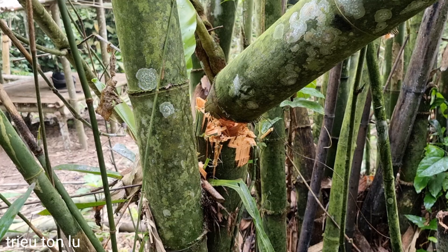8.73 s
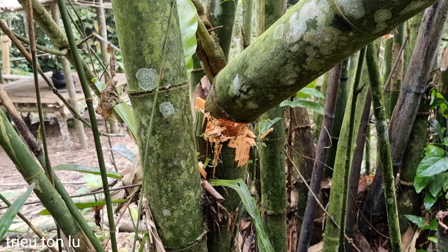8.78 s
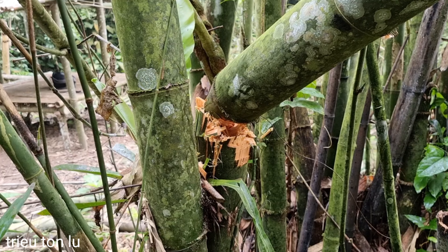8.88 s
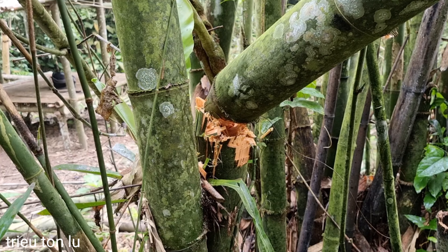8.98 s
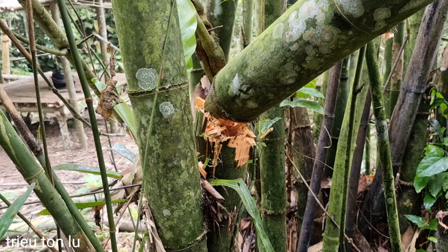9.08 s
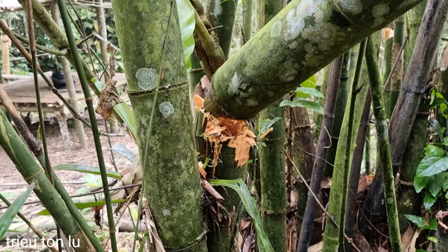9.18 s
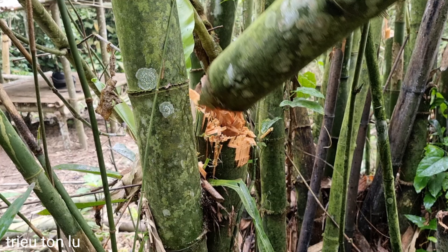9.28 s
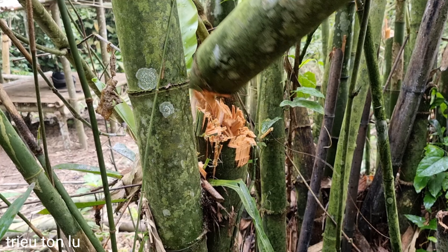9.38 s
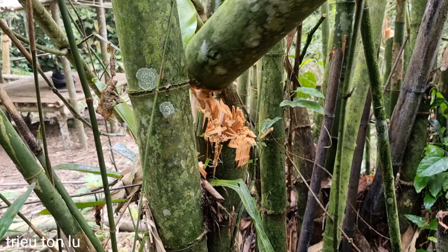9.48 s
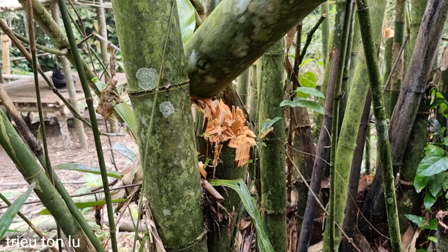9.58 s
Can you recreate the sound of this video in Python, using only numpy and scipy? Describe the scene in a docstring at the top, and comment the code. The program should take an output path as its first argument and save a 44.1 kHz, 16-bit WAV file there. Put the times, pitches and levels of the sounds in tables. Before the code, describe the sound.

A blade chops a thick hollow bamboo stem in sharp ringing cracks, then the cut stem is dragged with leafy scrapes and knocks in a grove.

```python
"""A grove hushes under far gliding whistles; a blade then chops a hollow green stem in noise bursts through
ringing modes, and the canes, trunks and a far slope answer with decaying noise tails. Splinters tick in between.
A near bird, left of centre, sings sliding sines and then an upward trill. Later the cut stem is dragged a little
right of centre: filtered leaf grains and rumble swell in slips, with low thumps and knocks on standing canes."""
import sys
import numpy as np
from scipy import signal
from scipy.fft import rfft, irfft, next_fast_len
from scipy.io import wavfile
from scipy.ndimage import uniform_filter1d, map_coordinates

SR = 44100
rng = np.random.default_rng(int(sys.argv[2]) if len(sys.argv) > 2 else 0)


def master_out(mix):
    """Clip the mix to full scale and print it as 16-bit PCM to the path in sys.argv[1]."""
    frames = np.transpose(np.atleast_2d(mix))
    ceiling = np.clip(frames, -1, 1)
    pcm = np.round(ceiling * 32767).astype(np.int16)
    wavfile.write(sys.argv[1], SR, pcm)


N = 424683

# Table levels are relative: each layer's mix gain sets its final loudness. Positive left-right dB leans left.

# Distant leaf hush over time: (time [s], level [dB])
HUSH_LEVEL = [(0, -68.5), (1.9, -67.5), (3, -67), (3.8, -67.5), (5.6, -68.5), (6.3, -70.5), (7, -65.5),
              (8.5, -63.5), (9.1, -69.5), (9.63, -64.5)]
# Colour of the hush: (frequency [Hz], density per hertz [dB])
HUSH_COLOUR = [(26, -41.5), (45, -10.5), (178, -12), (245, -3), (996, 1.5), (1270, 3), (1630, -6.5),
               (2030, -4), (3660, -7), (7850, -14), (10000, -22), (14500, -16), (16000, -35)]
# Stereo width of the hush: (frequency [Hz], left-right likeness [-1 to 1])
HUSH_LIKENESS = [(60, 0.41), (240, 0.1), (950, -0.83), (3770, 0.93), (15000, -0.16)]

# Near bird's opening notes: (time [s], start [Hz], end [Hz], glide [s], length [s], level [dB])
OPENING = [(1.903, 7530, 6220, 0.018, 0.043, -56), (2.109, 7140, 7890, 0.0039, 0.056, -54.5),
           (2.347, 8500, 8340, 0.011, 0.034, -53)]
# Its trill, one upward flick repeated: (time [s], level [dB])
TRILL = [(2.483, -49), (2.61, -47), (2.74, -46.5), (2.872, -47), (3.009, -47.5), (3.139, -50), (3.279, -51)]
FLICK_FROM_HZ, FLICK_TO_HZ, FLICK_GLIDE_S, FLICK_S = 5920, 8310, 0.0072, 0.023
SONG_ECHO_DB, SONG_PAN_DB = 2.5, 8
# Far whistles: (time [s], start [Hz], end [Hz], length [s], level [dB])
WHISTLES = [(0.049, 6090, 6150, .09, -80), (0.167, 6100, 6200, .05, -83), (0.888, 6110, 6200, .07, -80),
            (0.88, 3260, 3350, .1, -76), (1.302, 2755, 2900, .12, -84), (1.37, 6390, 6400, .09, -85),
            (3.4, 4150, 4150, .25, -86), (3.718, 6250, 6400, .12, -80), (4.651, 6780, 6700, .18, -84),
            (5.496, 2930, 3300, .06, -76), (5.555, 3300, 3050, .03, -78), (5.711, 6270, 6370, .24, -78),
            (5.749, 3160, 3350, .085, -81), (5.938, 6600, 6680, .17, -82), (6.19, 4460, 4450, .115, -73),
            (6.32, 4450, 4450, .17, -79), (6.515, 4700, 4630, .135, -75), (6.656, 4640, 4630, .04, -80)]
WHISTLE_GLIDE_SHARE, WHISTLE_ECHO_DB = .3, 1.5  # glide time over length
FLUTTER_DB, FLUTTER_FULL_S = 6, .11  # moving leaves break up long notes; full depth from this length

# Colours of the drag layers, scrape, leaf fizz, hollow rumble and grip:
# each (frequency [Hz], density per hertz [dB])
SCRAPE_COLOUR = [(350, -20.5), (600, -6.5), (800, -5), (983, -2.5), (1300, -5), (1420, -4.5), (2020, -1.5),
                 (2690, -6), (3200, -7), (3660, -9), (4270, -12.5), (6190, -19.5), (7000, -23), (9100, -44),
                 (15400, -120)]
FIZZ_COLOUR = [(3240, -46.5), (5500, -2.5), (9400, -5.5), (14600, -8), (15600, -0.5), (16000, -23)]
RUMBLE_COLOUR = [(100, -42), (170, -12.5), (248, -6.5), (361, 2), (522, -11), (740, -8), (800, -2.5),
                 (1040, -40), (1760, -120)]
GRIP_COLOUR = [(12, -33), (20, -2), (59, -1), (79, -2.5), (157, -15.5), (200, -9), (260, -52), (440, -120)]
# Faint singing resonances of the sliding stem: (frequency [Hz], width [Hz])
RUBBED_MODES = [(1250, 170), (2700, 160), (3700, 350)]
# Leaves stirring as the stem is handled:
# (time [s], level [dB], rumble relative to it [dB], fizz relative to it [dB])
RUSTLE = [(5.22, -85, -15, -11), (5.28, -67, -11, -8), (5.44, -69, 1, -12), (5.55, -86, -14, -18),
          (5.6, -110, -9, -9), (6.5, -110, -5, -9), (6.6, -73, -3.5, -12.5), (6.78, -68.5, -6.5, -7),
          (6.9, -51, -22, -18), (7.01, -56.5, -11, -19), (7.15, -50.5, -15, -17), (7.2, -62, 0, -9),
          (7.4, -73, -9, 2), (7.55, -60.5, -1, -7), (7.78, -57.5, -9, -12), (7.86, -69, -1.5, -1),
          (8.2, -67.5, 2.5, -4), (8.45, -66, -5.5, -1.5), (8.66, -73, 3.5, -10), (8.95, -68.5, -5.5, -1.5),
          (9.16, -78, 2.5, -7), (9.26, -59.5, -5, -16), (9.45, -46.5, -11, -20), (9.52, -79, 0, 6),
          (9.63, -66, -7, -5)]
RUSTLE_GRIP_DB = -19.5  # grip relative to the rustle
# Short slips, timed at their loudest:
# (time [s], scrape [dB], rise [s], fall [s], rumble relative to scrape [dB], fizz relative to scrape [dB])
SLIPS = [(6.63, -64.5, .08, .1, -4, -9), (6.81, -58, .05, 0.044, -12, -4.5),
         (7.034, -41.5, 0.14, 0.054, -17, -12), (7.279, -39.5, 0.074, 0.041, -12, -12),
         (7.329, -40.5, 0.054, 0.015, -3.5, -21), (7.489, -35, 0.044, 0.039, -7.5, -13),
         (7.745, -51.5, 0.068, 0.096, -2, -11), (8.514, -32.5, .006, 0.014, -20.5, -5),
         (9.25, -44.5, 0.018, .018, -3.5, -11), (9.291, -41.5, 0.013, 0.021, 1.5, -12),
         (9.345, -35, .03, 0.072, -6.5, -10), (9.47, -49.5, 0.043, 0.013, 9, -19),
         (9.63, -45, 0.049, .05, -8, -8)]
SWELL_RANGE_DB = 18.5  # lost over one rise or fall time, for slips and thumps
# Low thumps carried through the stem: (time [s], level [dB], fall [s])
THUMPS = [(1.7, -60, .05), (6.635, -60, 0.028), (6.89, -74, .03), (7.05, -59, .05), (7.13, -66, .08),
          (7.34, -51, 0.048), (7.41, -77, .05), (7.5, -61, 0.085), (7.6, -65, .1), (7.69, -66, 0.053),
          (8.225, -64, 0.067), (8.32, -71, 0.037), (8.52, -65, .07), (9.34, -61, .06), (9.41, -60, 0.089),
          (9.63, -71, .05)]
THUMP_RISE_S = 0.032

# Hollow stem resonances: (frequency [Hz], width [Hz], level [dB])
STEM_MODES = [(311, 52, 2), (497, 67, -1), (956, 350, -7.5), (1460, 30, -14), (1864, 240, -6),
              (2422, 160, -7), (3080, 1300, -7), (4560, 250, -21.5)]
# Centres of the tone control on every contact: (thud, knock, body, crack, snap [Hz])
BLOW_BANDS = [80, 370, 1400, 4400, 12000]
# Decay of the answer from near canes: (frequency [Hz], t60 [s])
CANE_DECAY = [(60, 0.37), (300, 0.37), (1000, 0.12), (3000, 0.18), (8000, 0.22), (15000, 0.022)]
# Decay of the answer from far trunks: (frequency [Hz], t60 [s])
TRUNK_DECAY = [(60, .35), (200, 0.47), (500, 0.91), (1200, 0.65), (2700, 0.73), (6000, 0.82), (15000, 0.25)]
# Colour of the late echo off a far slope: (frequency [Hz], gain [dB])
SLOPE_COLOUR = [(380, -36.5), (520, -5), (650, -4), (790, -8), (1100, -30), (2250, -23), (2650, -8.5),
                (3050, -23), (5000, -42)]
SLOPE_DELAY_S = .165
# Blade meeting stem; a split gives several cracks in a row:
# (time [s], peak [dB], ground thud [dB], hollow knock [dB], brightness [dB], splitting t60 [s, used up to 0.2],
#  echo [dB], note of the section [Hz], air chamber [Hz])
CHOPS = [(0.228, -9.5, -17.5, -10.5, -5, 0.13, 2.5, 1050, 270),
         (0.952, -16, -11.5, 1.5, -0.5, 0.14, 0.5, 1440, 398),
         (1.483, -24.5, -48, -9, -3, 0.16, 3.5, 1380, 519),
         (1.516, -25, -14, -4, 9.5, 0.081, -4.7, 1050, 297),
         (1.625, -41.5, -50, 3, 3.5, 0.064, 10, 910, 373),
         (1.644, -23.5, -17, -7.5, -4, 0.12, 1.7, 1070, 528), (2.869, -40, -19, -6, -2, 0.036, 3, 740, 513),
         (2.922, -36.5, -35, -13.5, -3, 0.06, 4.5, 935, 500), (2.945, -55, -36, 1, -1, 0.071, 3, 1300, 258),
         (3.866, -32, -73.5, -12, 2.5, 0.12, 1.16, 1460, 474),
         (4.002, -38, -41.5, -29, 4.5, 0.27, 2.5, 3010, 318),
         (4.009, -25, -56.5, -10.5, 3.5, 0.057, -5.5, 2485, 411),
         (4.198, -19.5, -60.5, -19, -8.5, 0.13, 11, 1860, 500),
         (4.22, -13.5, -50, -16.5, 6.5, 0.15, -4.5, 1030, 506),
         (4.227, -4, -30, -26, -16.5, 0.13, 0.55, 940, 574),
         (4.235, -14.5, -27.5, -7.5, -4.5, 0.05, 5, 1750, 295),
         (4.341, -8.5, -42.5, -9, -2.5, .072, 3, 1217, 303),
         (4.893, -34, -32.5, -10.5, 3.5, .14, 7.5, 1820, 500),
         (4.909, -16.5, -60, -19, -4.5, 0.25, 3, 983, 602),
         (4.917, -16, -35.5, -13.5, 4, 0.092, -6.5, 1660, 531),
         (4.923, -14.5, -32, -13, -24, .11, 0.8, 1636, 281),
         (5.844, -29, -48, -10.5, -3.5, 0.12, -1, 1330, 317.5)]
# Splinters and twigs ticking: (time [s], peak [dB], brightness [dB], note [Hz], left-right [dB])
TICKS = [(1.613, -51, 9, 2900, -1.2), (1.849, -55, 17, 1898, 1), (1.984, -50, 5, 2490, 2.5),
         (2.406, -48, 9, 1948, 2), (2.451, -58.5, 8, 2450, 1.5), (2.484, -49, 9.5, 2900, 2),
         (2.635, -50, 9.5, 3270, 3), (2.743, -69, 15, 3343, .2), (2.794, -65, 14, 2350, -2),
         (3.004, -55.5, 5, 1310, -2.5), (3.319, -58, -4, 1430, -3), (3.497, -57.5, -5, 3320, 5),
         (3.633, -55, -10.5, 1210, 6), (3.745, -61.5, 10, 3370, 1.5), (4.737, -53.5, 0, 1350, 3),
         (4.764, -42.5, -8, 942, 3), (5.31, -57.5, 4.5, 2600, 6), (5.411, -54, -1, 2815, 4),
         (6.199, -59, -1, 1223, -2.5), (8.462, -46, -5, 1795, -2.2), (9.028, -58, -4, 1470, -3)]
TICK_THUD_DB, TICK_KNOCK_DB, TICK_T60_S, TICK_HOLLOW_HZ, TICK_ECHO_DB = -39, -17.5, 0.074, 409, 1
# Thin dry twigs snapping: (time [s], peak [dB], top treble [dB], left-right [dB])
TWIGS = [(0.714, -72, 6, 3), (0.767, -74, 1, -.6), (2.251, -55, 15, 2.5), (7.8, -63.5, 13, -1),
         (7.936, -70, 10, .6), (8.513, -43, 5.5, -5), (8.56, -56, 10, -1), (8.605, -69, 14, -5),
         (8.919, -71.5, 15, -3)]
TWIG_BRIGHT_DB, TWIG_T60_S, TWIG_ECHO_DB, TWIG_HZ = 13.5, 0.053, -4.5, 2945
# Dragged stem knocking on standing canes:
# (time [s], peak [dB], hollow knock [dB], brightness [dB], note [Hz])
KNOCKS = [(5.349, -57.5, 6, 2, 2960), (6.893, -36.5, -20, -21, 1255), (6.968, -37.5, -13.5, -21, 1270),
          (6.994, -41, -28, -2, 2660), (7.045, -24, -11.5, -17, 1270), (7.064, -32, -9, -12, 1290),
          (7.124, -30, -21, -47, 1090), (7.22, -38, -22, 0.2, 2140), (7.258, -35, -33, 3, 2700),
          (7.271, -27.5, -25, -19, 1240), (7.294, -25.5, -18, -32, 1640), (7.316, -26, -28, -16, 1080),
          (7.453, -35.5, -15, -7, 1650), (7.472, -35, -3, 0, 1730), (7.487, -51, -5, -17, 2060),
          (7.494, -28, -25, -14, 1960), (7.552, -51.5, 18.5, -12, 1920), (7.617, -51, -11, 7, 780),
          (7.703, -45, -5, -14, 1140), (7.735, -42, -21, 10.5, 2200), (7.786, -45.5, -22, -6, 2520),
          (7.969, -48.5, -10, -7, 2560), (8.284, -52, 4.5, -28, 704), (8.313, -48.5, -17.5, 6.5, 1483),
          (9.242, -38, -15, -16, 821), (9.254, -55, -5, 17, 3390), (9.288, -43, -14, 6, 1770),
          (9.317, -34, -27, -18, 1710), (9.336, -36, -18, -11, 2130), (9.35, -39, -13, -5, 1070),
          (9.365, -37, 5.5, 11, 1650), (9.462, -29, -14, -24, 1080), (9.526, -49, -3, -9, 1000),
          (9.544, -58, 1, 8, 2660), (9.596, -50, 6, 4, 970)]
KNOCK_THUD_DB, KNOCK_T60_S, KNOCK_HOLLOW_HZ, KNOCK_ECHO_DB, KNOCK_PAN_DB = -32, 0.031, 365, 0, -2.5
SNAP_DB, SNAP_PER_BRIGHT = -17, 0.72  # the highest treble follows brightness

TOP_HZ = 15700  # the treble falls away around here


def amp(db):
    """Gain of a level in dB."""
    return 10 ** (np.asarray(db) / 20)


def unit(x):
    """x at rms 1."""
    return x / np.sqrt(np.mean(x ** 2) + 1e-20)


def along(points, hz):
    """Read (Hz, value) points on a log frequency axis."""
    f, v = np.transpose(points)
    return np.interp(np.log(hz + 1), np.log(f + 1), v)


def curves(rows):
    """One value per sample for each column after the time; silent outside."""
    s, *cols = np.transpose(rows)
    return [np.interp(np.arange(N) / SR, s, c, left=-150, right=-150) for c in cols]


def wobble(rate):
    """A smooth random curve, rate knots a second."""
    knots = rng.standard_normal(int(N * rate / SR) + 4)
    return map_coordinates(knots, [np.arange(N) * rate / SR])


def filtered(x, response, pad=8192):
    """x times a response of frequency."""
    m = next_fast_len(x.shape[-1] + pad)
    spectrum = rfft(x, m) * response(np.fft.rfftfreq(m, 1 / SR))
    return irfft(spectrum, m)[..., :x.shape[-1]]


def causal(gain):
    """Minimum-phase response with this gain, so a filtered hit has no pre-ring."""
    cepstrum = irfft(np.log(gain + 1e-6))
    half = len(cepstrum) // 2
    cepstrum[1:half] *= 2
    cepstrum[half + 1:] = 0
    return np.exp(rfft(cepstrum))


def add(out, s, x, pan_db=0):
    """Mix a sound into stereo at time s; positive pan leans left."""
    part = out[:, round(s * SR):][:, :x.shape[-1]]
    part += x[..., :part.shape[1]] * amp(np.array([[.5], [-.5]]) * pan_db)


def drift(shape, bins, frames):
    """A random field at rms 1, smoothed over frequency bins and time frames."""
    field = uniform_filter1d(rng.standard_normal(shape), bins, 0)
    return unit(uniform_filter1d(field, frames, 1))


def patchy(x, patchy_db):
    """x with a random gain that drifts over time and frequency."""
    z = signal.stft(x, nperseg=512)[2]
    gain = amp(patchy_db * drift(z.shape[1:], 5, 10))
    return signal.istft(z * gain, nperseg=512)[1][:, :N]


def spread(x, alike):
    """Stereo from two unrelated signals, with a likeness that depends on frequency."""
    def mid_side(hz):
        turn = np.arccos(np.clip(along(alike, hz), -1, 1)) / 2
        return np.array([np.cos(turn), np.sin(turn)])
    mid, side = filtered(x, mid_side)
    return np.array([mid + side, mid - side])


def tail(decay, alike, size=32768):
    """A fresh stereo noise tail, its left side at energy 1; each frequency dies at its own speed."""
    hz, t, z = signal.stft(rng.standard_normal((3, size)), SR, nperseg=256)
    unevenness = 3 * drift(z.shape[1:], 2, 9)  # dB; trunks stand unevenly
    t60 = np.maximum(along(decay, hz), .02)[:, None]
    noise = signal.istft(z * amp(unevenness - 60 * t / t60), SR, nperseg=256)[1]
    stereo = alike * noise[2] + noise[:2]
    return stereo / np.linalg.norm(stereo[0])


def forest():
    """The distant hush of leaves: coloured noise in faint patches, its level drifting."""
    pair = patchy(rng.standard_normal((2, N)), 2.0)
    s, db = np.transpose(HUSH_LEVEL)
    level = amp(np.interp(np.arange(N) / SR, s, db) + 1.1 * wobble(6))
    hush = filtered(pair, lambda hz: amp(along(HUSH_COLOUR, hz)))
    return level * unit(spread(hush, HUSH_LIKENESS))


def notes():
    """All notes as (time [s], start [Hz], end [Hz], glide [s], length [s], level [dB], echo [dB], pan [dB])."""
    trill = [(s, FLICK_FROM_HZ, FLICK_TO_HZ, FLICK_GLIDE_S, FLICK_S, db) for s, db in TRILL]
    song = [tuple(row) + (SONG_ECHO_DB, SONG_PAN_DB) for row in OPENING + trill]
    far = [(s, start, end, WHISTLE_GLIDE_SHARE * length, length, db, WHISTLE_ECHO_DB, 0)
           for s, start, end, length, db in WHISTLES]
    return song + far


def birds():
    """Each note is a sine that slides towards its end pitch, then hangs in the trees."""
    out = np.zeros((2, N))
    for s, start_hz, end_hz, glide, length, db, echo_db, pan_db in notes():
        t = np.arange(int(length * SR)) / SR
        pitch = end_hz + (start_hz - end_hz) * np.exp(-t / glide)
        waver = unit(uniform_filter1d(rng.standard_normal(len(t)), 150))
        pitch = pitch + 14 * amp(echo_db) * waver  # more echo, more waver
        attack = (1 - np.exp(-t / min(glide, .015))) ** 0.93  # swells as the slide settles
        release = np.clip((length - t) / 0.005, 0, 1)
        flutter = uniform_filter1d(rng.standard_normal(len(t)), 500)
        flutter = np.clip(unit(uniform_filter1d(flutter, 300)), -2, 1)
        flutter_db = FLUTTER_DB * min(length / FLUTTER_FULL_S, 1) ** 2
        shape = release * attack * amp(flutter_db * flutter)
        note = np.sqrt(2) * amp(db) * shape * np.sin(2 * np.pi * np.cumsum(pitch) / SR)
        add(out, s, np.array([note, np.roll(note, 3)]), pan_db)  # right side 3 samples late
        echo = tail([(100, 0.18)], alike=0.65) + amp(-9.5) * tail([(100, 2.3)], alike=.1)
        add(out, s + 0.0016, amp(echo_db) * signal.fftconvolve(note[None], echo, axes=1))
    return out


def grains(rate, spread_db, smooth):
    """Two trains of tiny uneven leaf snaps, rate a second each, over a share of smooth rubbing."""
    sizes = amp(spread_db * np.clip(rng.standard_normal((2, N)), -2, 2))
    snaps = (rng.random((2, N)) < rate / SR) * sizes
    snaps = signal.lfilter([1], [1, -.95], snaps) * rng.standard_normal((2, N))  # about a millisecond each
    return unit(snaps) + smooth * rng.standard_normal((2, N))


def swell(s, db, rise, fall):
    """Level in dB that climbs to a peak at s and drops again."""
    t = np.arange(N) / SR - s
    return db - SWELL_RANGE_DB * np.where(t < 0, -t / max(rise, .002), t / max(fall, .002))


def handling():
    """Levels of scrape, rumble, fizz and grip: the rustle, with slips and thumps rising out of it."""
    rustle, *under = curves(RUSTLE)
    bed = rustle + np.array([0 * rustle, *under])
    slips = [swell(s, db, rise, fall) + np.array([[0], [rumble], [fizz]])
             for s, db, rise, fall, rumble, fizz in SLIPS]
    scrape_db, rumble_db, fizz_db = np.max(slips + [bed], axis=0)
    thumps = [swell(s, db, THUMP_RISE_S, fall) for s, db, fall in THUMPS]
    grip_db = np.max(thumps + [rustle + RUSTLE_GRIP_DB], axis=0)
    return scrape_db, rumble_db, fizz_db, grip_db


def drag():
    """Leaves crackle, the stem rumbles as it slides, and the grip thumps; friction comes in short slips."""
    out, slip = 0, wobble(35)  # scrape and fizz share the slip wobble
    scrape_db, rumble_db, fizz_db, grip_db = handling()
    scrape = patchy(grains(450, spread_db=4.5, smooth=1.1), 2.2)
    fizz = patchy(grains(700, spread_db=6.5, smooth=1.1), 1.2)
    rumble = patchy(grains(150, spread_db=4.5, smooth=0.82), 1.4)
    grip = rng.standard_normal((2, N))
    layers = [  # (level [dB], colour, source, left-right likeness)
        (scrape_db - 4.5 + 2.2 * slip, SCRAPE_COLOUR, scrape, .4),
        (fizz_db + 2.5 * slip + 0.52 * wobble(25), FIZZ_COLOUR, fizz, .3),
        (rumble_db - 1.5 + 1.7 * wobble(25), RUMBLE_COLOUR, rumble, .7),
        (grip_db + 0.5 + 3 * wobble(6.4), GRIP_COLOUR, grip, .97)]
    for db, colour, source, alike in layers:
        layer = filtered(source, lambda hz: amp(along(colour, hz)))
        out = out + amp(db) * unit(spread(layer, [(100, alike)]))
    out = filtered(out, lambda hz: 1 + sum(0.68 / (1 + (2 * (hz - c) / w) ** 2) for c, w in RUBBED_MODES))
    out = out * amp([[-1.3], [1.3]])  # leans right
    return out + amp(-7.0) * signal.fftconvolve(out, tail(CANE_DECAY, alike=0.47), axes=1)[:, :N]


def contacts():
    """Chops, ticks, twigs and knocks in one form: each kind fills in what its events share."""
    def snap(bright):
        return SNAP_DB + SNAP_PER_BRIGHT * bright
    # (time, peak, thud, knock, brightness, snap, pan, t60, echo, note, air chamber)
    rows = [(s, db, thud, knock, bright, snap(bright), 0, t60, echo, note, hollow)
            for s, db, thud, knock, bright, t60, echo, note, hollow in CHOPS]
    rows += [(s, db, TICK_THUD_DB, TICK_KNOCK_DB, bright, snap(bright), pan,
              TICK_T60_S, TICK_ECHO_DB, note, TICK_HOLLOW_HZ) for s, db, bright, note, pan in TICKS]
    rows += [(s, db, TICK_THUD_DB, TICK_KNOCK_DB, TWIG_BRIGHT_DB, top, pan,
              TWIG_T60_S, TWIG_ECHO_DB, TWIG_HZ, TICK_HOLLOW_HZ) for s, db, top, pan in TWIGS]
    rows += [(s, db, KNOCK_THUD_DB, knock, bright, snap(bright), KNOCK_PAN_DB,
              KNOCK_T60_S, KNOCK_ECHO_DB, note, KNOCK_HOLLOW_HZ) for s, db, knock, bright, note in KNOCKS]
    return rows


def stem_ring(hz, ring_hz):
    """Resonance gain of the hollow stem; mode levels vary from hit to hit."""
    modes = STEM_MODES + [(ring_hz, 110, 5)]  # the struck section adds its own note
    return 0.34 + sum(amp(level + rng.normal(0, 3.4)) / (1 + (2 * (hz - c) / w) ** 2) for c, w, level in modes)


def splitting(t, t60):
    """Fibres snap unevenly: a decaying stereo noise burst, sharpest at first contact."""
    n = len(t)
    sizes = amp(np.clip(rng.standard_normal(n // 32), -2, 1.5).repeat(32))  # uneven fibre snaps
    cracks = rng.standard_normal((3, n)) * sizes * amp(-60 * t / t60) * (t < .12)
    cracks = cracks * (1 - np.exp(-t / .0003)) * (1 + 1.2 * np.exp(-t / .003))
    cracks = cracks[2] + 0.58 * cracks[:2]  # both ends of the stem radiate differently
    return cracks / np.linalg.norm(cracks[0])


def air_chamber(t, hollow_hz, t60):
    """Air in the hollow booms as a decaying sine that starts sharp and settles."""
    cycles = hollow_hz * (t + .3 * .022 * (1 - np.exp(-t / .022)))
    return amp(-60 * t / (.06 + .6 * t60)) * (1 - np.exp(-t / .007)) * np.sin(2 * np.pi * cycles)


def grove_answer():
    """Near canes and far trunks scatter sound back as noise tails that build up, then die."""
    near = np.pad(tail(CANE_DECAY, alike=.35, size=16384), ((0, 0), (0, 16384)))
    echo = amp(-3) * near + amp(-13) * tail(TRUNK_DECAY, alike=.55)
    return echo * (1 - np.exp(-np.arange(echo.shape[1]) / SR / .012))


def blows():
    """Bursts of fibre cracks ring the hollow stem; canes, trunks and a slope scatter them back."""
    out, n = np.zeros((2, N)), 8192
    t, hz = np.arange(n) / SR, np.fft.rfftfreq(n, 1 / SR)
    for s, db, thud_db, knock_db, crack_db, snap_db, pan_db, t60, echo_db, ring_hz, hollow_hz in contacts():
        ring = stem_ring(hz, ring_hz)
        levels = [thud_db - 10, thud_db + 19, knock_db + 4.5, 0, crack_db - 4.0, snap_db + 2]
        tone = list(zip([20] + BLOW_BANDS, levels))
        tilt = lambda f: amp(along(tone, f))
        t60 = np.clip(t60, .004, .2)
        size = amp(db - 19.0) * np.sqrt((t60 + 0.015) * SR)  # longer splits carry more energy
        body = np.sqrt(np.mean(ring[(hz > 800) & (hz < 2500)] ** 2))  # evens out the random modes
        hit = irfft(rfft(splitting(t, t60)) * (causal(ring * tilt(hz)) / body))
        add(out, s, amp(13.5) * size * hit, pan_db)
        boom = air_chamber(t, hollow_hz, t60)
        add(out, s, amp(db + knock_db - 2.0) * np.array([boom, boom]), pan_db)
        echo = filtered(grove_answer(), lambda f: tilt(f) * np.interp(f, hz, ring) ** 0.28)
        add(out, s + .003, amp(echo_db + 9.5) * size * echo, pan_db * 0.37)
        if db > -32:  # only hard blows come back from the slope, heavy ones most
            late = filtered(tail([(100, 1.0)], alike=0.12), lambda f: amp(along(SLOPE_COLOUR, f)))
            add(out, s + SLOPE_DELAY_S, amp(.5 * thud_db + 3) * size * late)
    return out


def scene():
    """All sources in the grove."""
    return forest() + birds() + drag() + blows()


def record(dry):
    """Two close microphones hear the same bass and differ most in the treble; the top of the band is cut."""
    dry = dry / (1 + np.abs(dry / .75) ** 4) ** (1 / 4)  # the hardest cracks are softly rounded
    mid, side = (dry[0] + dry[1]) / 2, (dry[0] - dry[1]) / 2
    side = filtered(side, lambda hz: 1.2 * hz ** 2 / (hz ** 2 + 280 ** 2) * (1 + hz / 25000))
    edges = [TOP_HZ - 400, TOP_HZ, TOP_HZ + 900, TOP_HZ + 950]
    band = lambda hz: amp(np.interp(hz, edges, [0, -22, -35, -120]))
    return filtered(np.array([mid + side, mid - side]), band)


dry = scene()
out = record(dry)
master_out(out)
```